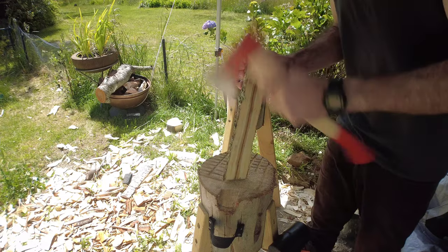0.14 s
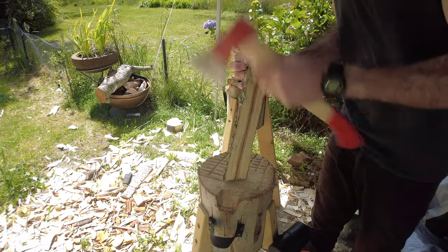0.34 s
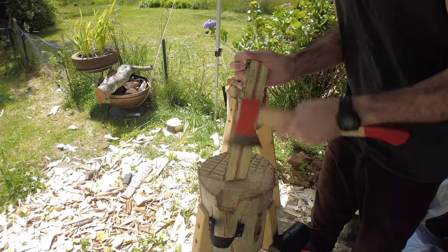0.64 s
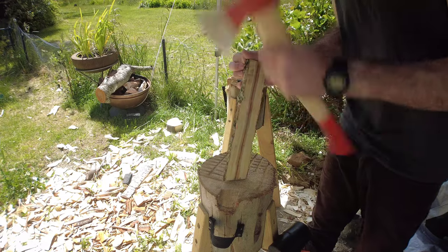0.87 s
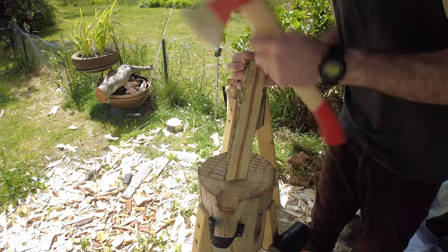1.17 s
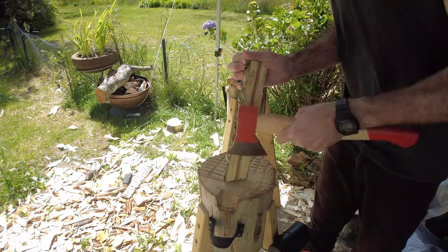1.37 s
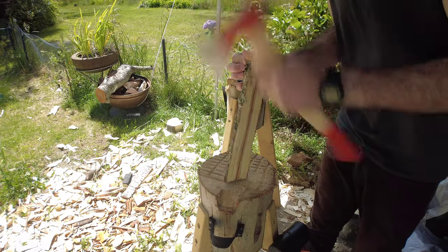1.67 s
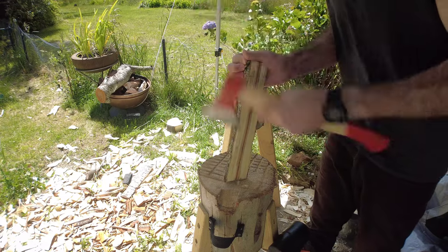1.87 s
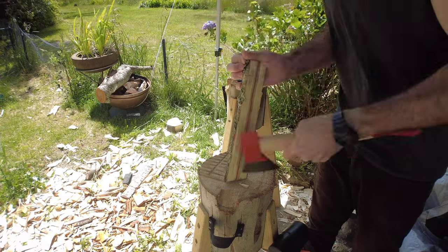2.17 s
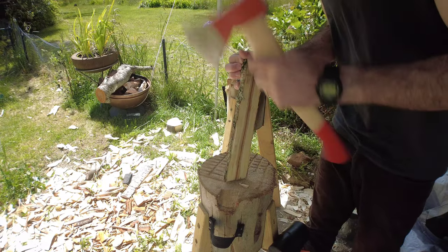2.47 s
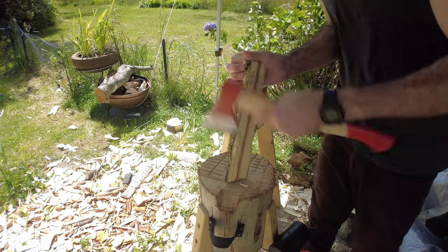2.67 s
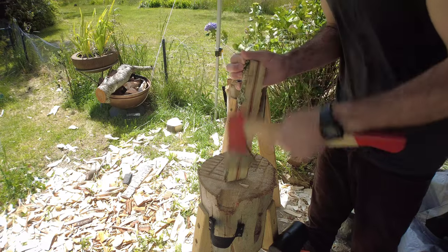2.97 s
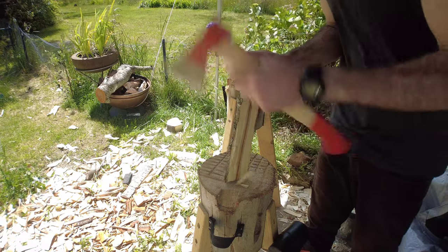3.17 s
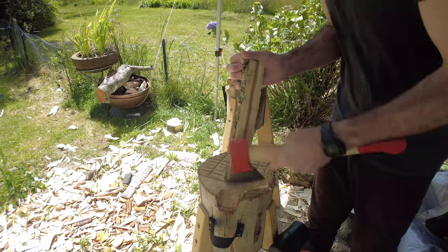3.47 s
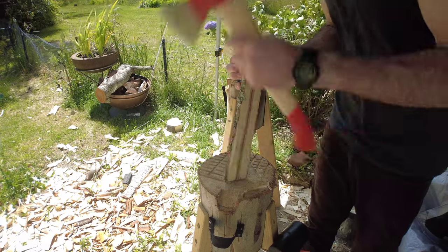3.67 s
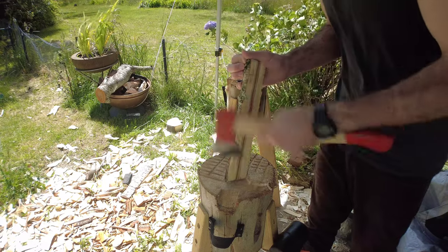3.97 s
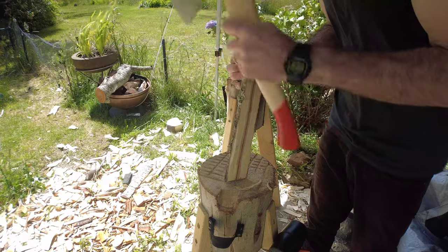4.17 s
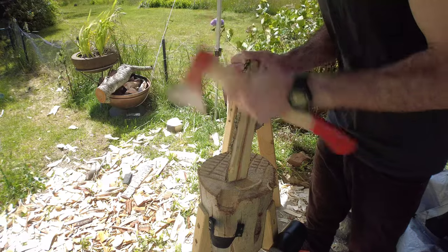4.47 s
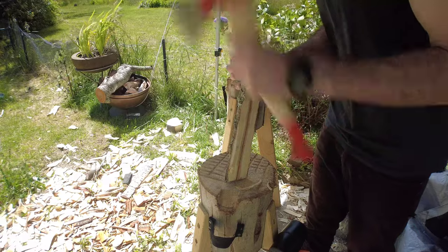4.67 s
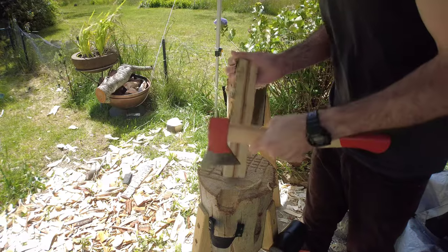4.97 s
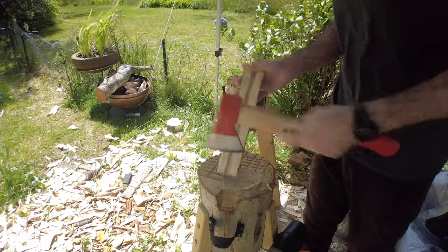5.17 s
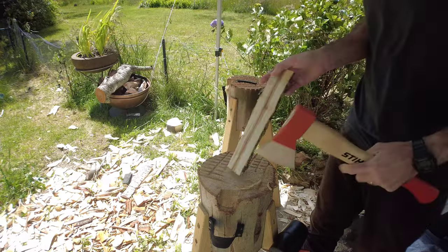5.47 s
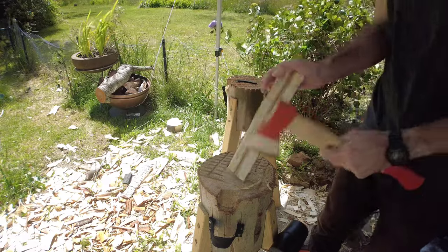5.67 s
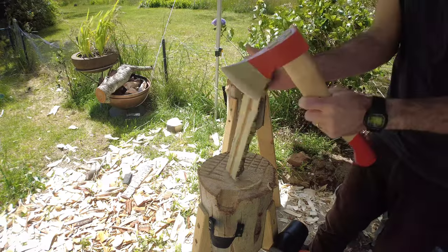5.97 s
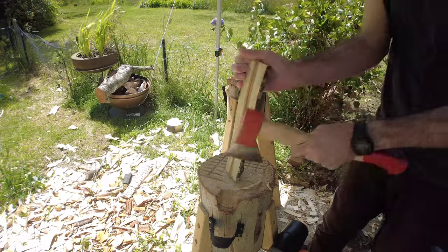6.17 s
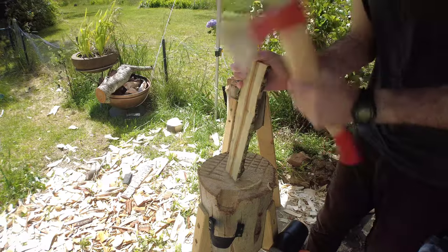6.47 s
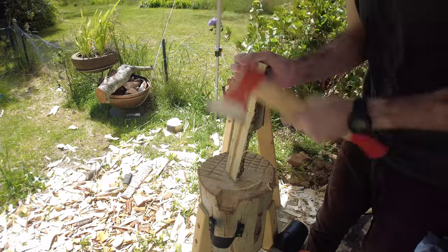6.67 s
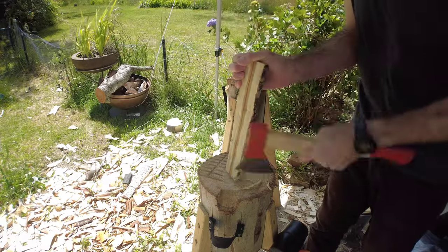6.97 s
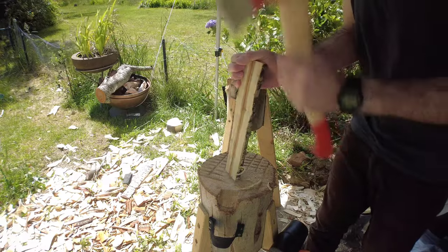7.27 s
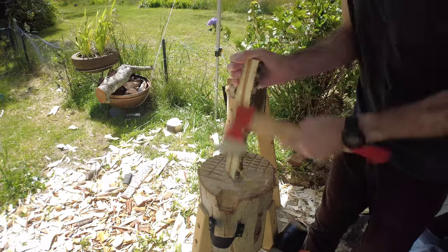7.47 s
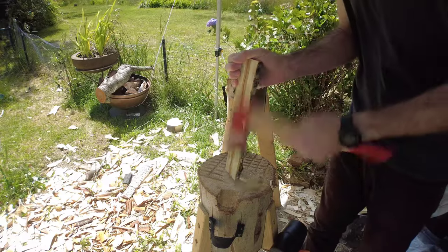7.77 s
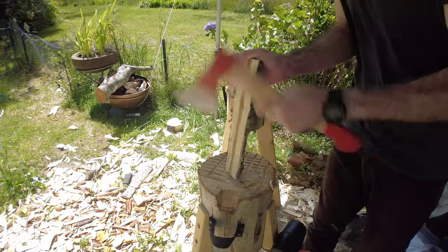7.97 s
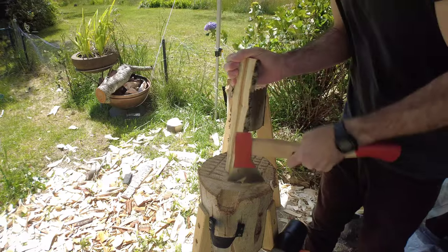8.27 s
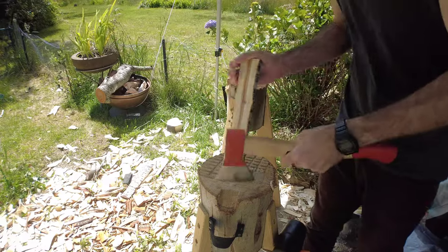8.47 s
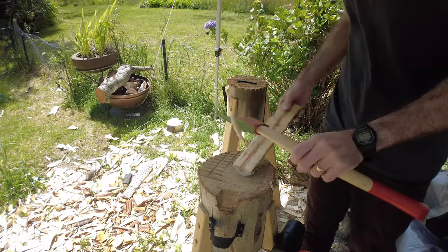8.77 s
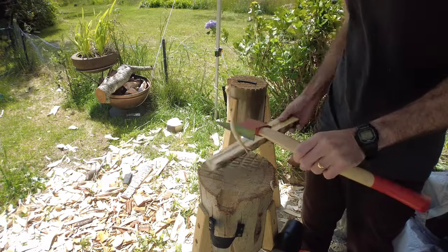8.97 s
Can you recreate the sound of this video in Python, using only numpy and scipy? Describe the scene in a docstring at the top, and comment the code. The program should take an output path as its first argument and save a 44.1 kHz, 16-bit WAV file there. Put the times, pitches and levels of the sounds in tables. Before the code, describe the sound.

Close, dry hatchet strokes on a wooden blank, about five every two seconds, each a sharp knock with fibrous crackle and slight steel ringing. Wind rumbles on the microphone midway. A heavier thud into the block precedes a short pause with sliding, a squeak and light taps as the blank is turned. Softer strokes restart, grow stronger, and end with a thud and small splinter snaps. Quiet open garden, nearly mono.

```python
"""A hatchet shaves a dry wooden blank held upright on a chopping block in a garden.
Each stroke is a sharp pulse of air, then bursts of fibre fractures exciting the modes of blank, shaving and steel head.
Some strokes run on into the block; between strokes the blank slides, squeaks and taps, as excited resonances and tones.
Shaped noise makes the wind on the microphone and the garden; a thin, wavering sine squeals far off."""
import sys
import numpy as np
from scipy import signal
from scipy.fft import rfft, irfft, next_fast_len
from scipy.io import wavfile
from scipy.ndimage import uniform_filter1d

SR = 44100
rng = np.random.default_rng(int(sys.argv[2]) if len(sys.argv) > 2 else 0)


def dump_mix(stems):
    """Bounce the given channels to the path in sys.argv[1] as a 16-bit WAV at rate SR."""
    frames = np.atleast_2d(stems).T  # one column per channel
    limited = np.clip(frames, -1, 1)  # hard clip at full scale
    pcm = np.round(limited * 32767).astype(np.int16)
    wavfile.write(sys.argv[1], SR, pcm)


N = 402054
TIME = np.arange(N) / SR
BLOW = TIME[:SR // 6]   # time within one blow (s)


def from_db(db):
    """Level: decibels to amplitude gain."""
    return 10 ** (np.asarray(db) / 20)


def rms_one(x):
    """Normalisation of power: scale to rms 1."""
    return x / np.sqrt(np.mean(x ** 2) + 1e-20)


def burst_one(x, seconds):
    """Normalisation of energy: scale to the energy of rms 1 held for that long."""
    return x / np.sqrt(np.sum(x ** 2) / (seconds * SR) + 1e-20)


def level_curve(rows):
    """Envelope: gain at every sample, linear in decibels between rows of start_s, level_db."""
    return from_db(np.interp(TIME, *np.transpose(rows)))


def add(track, s, sound):
    """Superposition: mix a sound into the track at time s."""
    at = max(0, round(s * SR))
    track[at:at + len(sound)] += sound[:max(0, N - at)]


def lowpass(x, hz):
    """Second-order low-pass filtering: take off the treble."""
    return signal.sosfilt(signal.butter(2, hz, fs=SR, output="sos"), x)


def colour(x, spectrum):
    """Minimum-phase filtering: shape by a spectrum with a causal response, through the folded cepstrum."""
    size = next_fast_len(len(x) + 4096, True) // 2 * 2
    hz, db = np.transpose(spectrum)
    log_hz = np.log(np.maximum(np.arange(size // 2 + 1) * SR / size, 1))
    below = np.maximum(np.log(hz[0]) - log_hz, 0)
    log_gain = np.log(from_db(np.interp(log_hz, np.log(hz), db)))
    cepstrum = irfft(log_gain - 2 * below)   # 12 dB per octave down below the first point
    cepstrum[1:size // 2] *= 2
    cepstrum[size // 2 + 1:] = 0
    return irfft(rfft(x, size) * np.exp(rfft(cepstrum)))[:len(x)]


def drift(rate):
    """Slow modulation: random values, rate per second, joined by straight lines."""
    return np.interp(TIME * rate, np.arange(N // 10), rng.standard_normal(N // 10))


def resonate(x, modes):
    """Modal superposition: parallel resonances, each with energy set by its height and width."""
    out = 0
    for hz, width, db in modes:
        radius = np.exp(-np.pi * width / SR)
        poles = [1, -2 * radius * np.cos(2 * np.pi * hz / SR), radius * radius]
        ringing = rms_one(signal.lfilter([1, 0, -1], poles, x + 1e-18))
        out = out + rng.choice([-1, 1]) * from_db(db) * np.sqrt(width) * ringing
    return out


def touched(modes, spread_db, detune):
    """Modal participation: a new contact point and grip shifts the modes and redistributes their energy."""
    luck = rng.standard_normal((len(modes), 2))
    return [(hz * np.exp(detune * a), width, db + spread_db * b)
            for (hz, width, db), (a, b) in zip(modes, luck)]


def fractures(hold, fade_t60, grain_db, sag_db=0):
    """Acoustic emission: dense uneven snaps that sag over the hold time and then die away."""
    sizes = from_db(grain_db * np.minimum(rng.standard_normal(len(BLOW)), 2))
    snaps = rng.choice([-1, 1], len(BLOW)) * sizes
    sag = sag_db * np.minimum(BLOW / hold, 1)
    fade = 60 * np.maximum(BLOW - hold, 0) / fade_t60
    return snaps * from_db(-sag - fade)


# distant background: start_s, level_db (before the level given to the function)
AMBIENCE = [(0.0, -65.5), (3.53, -64), (8.12, -70), (9.12, -66.5)]
# spectrum of the garden: pitch_hz, level_db (per Hz, relative)
GARDEN = [(41, -37), (70, -8), (178, -14.5), (360, -15.5), (554, -15.5), (761, -13), (2170, -27.5),
          (2910, -31.5), (4000, -37), (5370, -35), (5890, -38.5), (16000, -35.5)]


def background(level_db):
    """Filtered noise from many incoherent sources: the soft wash of distant leaves and roads."""
    wash = rms_one(colour(rng.standard_normal(N), GARDEN))
    return from_db(level_db) * level_curve(AMBIENCE) * wash


SQUEAL_HZ = 2877
# thin far squeal: start_s, level_db (before flutter)
SQUEAL = [(1.15, -85), (1.4, -70), (1.58, -80), (1.9, -71), (2.7, -72), (3.13, -59), (3.38, -76.5),
          (3.85, -72.5), (5.0, -88.5)]


def squeal(waver_hz, flutter_db):
    """Frequency and amplitude modulation: a thin far tone wavers, swells unevenly, fades in and out."""
    pitch_hz = SQUEAL_HZ + waver_hz * drift(25)
    tone = np.sin(2 * np.pi * np.cumsum(pitch_hz) / SR) * from_db(flutter_db * drift(9))
    fade = np.clip(np.minimum(TIME - SQUEAL[0][0], SQUEAL[-1][0] - TIME) / 0.14, 0, 1)
    return fade * level_curve(SQUEAL) * rms_one(tone)


PUFF_DB, PUFF_GROWTH = -33.5, 0.65   # level of the puffs; extra dB of puffs for each dB of gust
# wind on the microphone: start_s, level_db
GUSTS = [(0, -49), (.9, -53.5), (1.7, -45.5), (2.45, -39.5), (2.85, -32.5), (2.96, -20), (3.12, -27),
         (3.8, -23), (3.99, -18), (4.15, -25.5), (4.65, -33.5), (5.8, -26.5), (6.15, -32), (6.3, -24),
         (6.82, -29.5), (6.95, -40.5), (7.45, -37), (7.75, -40), (8.15, -34), (9.1, -45.5)]
# spectrum of the slow eddies: pitch_hz, level_db (per Hz, relative)
WIND = [(4, 9.5), (11, 7), (20, -5.5), (31, -4.5), (43, -22), (60, -20), (100, -39), (3000, -150)]
# spectrum of the finer turbulence: pitch_hz, level_db (per Hz, relative)
TURBULENCE = [(60, 9.5), (160, 5), (300, -7.5), (900, -12), (6000, -58)]


def wind():
    """Turbulent pressure: slow eddies follow the gust, and each sheds a puff of finer turbulence."""
    gust = level_curve(GUSTS)
    eddies = colour(rng.standard_normal(N), WIND)
    eddies /= np.sqrt(uniform_filter1d(eddies ** 2, size=SR // 4))   # even strength before the gusts
    fine = rms_one(colour(rng.standard_normal(N), TURBULENCE))
    puffs = np.abs(eddies) * rms_one(gust) ** PUFF_GROWTH * fine
    return gust * (eddies + from_db(PUFF_DB) * puffs)


def grains(per_s, grain_db):
    """Friction as a random point process: fibres catch and let go in clicks of uneven size."""
    caught = rng.random(N) < per_s / SR
    sizes = from_db(grain_db * np.minimum(rng.standard_normal(N), 1.5))
    return caught * rng.choice([-1, 1], N) * sizes


SLIDE_SWELL_DB = 23.5   # fall from the peak of a slide to half its length away
HANDLING_DB, HANDLING_GRAINS_PER_S = -80, 500   # soft rustle of the grip
# hand, sleeve and blank sliding: peak_s, length_s, level_db (before a common trim)
SLIDES = [(2.45, 0.4, -62.5), (3.434, .11, -49.5), (3.71, 0.16, -52.5), (4.504, 0.45, -65.5),
          (5.234, 0.21, -55), (5.311, .08, -56.5), (5.353, 0.07, -52), (5.449, 0.14, -47.5),
          (5.764, 0.37, -64.5)]
# what sliding makes ring: pitch_hz, width_hz, level_db (relative)
RUB = [(1440, 270, 8), (3000, 150, 8.5), (4080, 320, 2.5), (4970, 310, 5), (5650, 1600, 0), (7100, 1700, 0)]


def slides(grain_db, stutter_db):
    """Friction excitation: grains ring resonances that stutter separately, over a faint rustle of the grip."""
    rub = 0
    for hz, width, db in RUB:
        stutter = stutter_db * np.clip(drift(70), -2, 1.5)
        rub = rub + from_db(db + stutter) * resonate(grains(1100, grain_db), [(hz, width, 0)])
    swells = 0
    for s, length, db in SLIDES:
        distance = np.minimum(2 * np.abs(TIME - s) / length, 10)
        swells = swells + from_db(db - SLIDE_SWELL_DB * distance)
    grip = resonate(grains(HANDLING_GRAINS_PER_S, grain_db), RUB)
    grip = grip * from_db(3.3 * np.minimum(drift(18), 2))
    return from_db(-5.0) * swells * rms_one(rub) + from_db(HANDLING_DB) * rms_one(grip)


# the blank squeaks as it is twisted on the block: start_s, level_db
SQUEAK = [(5.38, -74), (5.455, -51.5), (5.53, -81)]
# its partials: multiple (of the pitch), level_db (relative)
SQUEAK_PARTIALS = [(1, -12), (3, -18)]


def squeak(pitch_hz, jitter, flutter_db):
    """Stick-slip oscillation: wood grips and slips on wood, unsteady in rate and strength."""
    phase = 2 * np.pi * np.cumsum(pitch_hz * (1 + jitter * drift(900))) / SR
    tone = sum(from_db(db + flutter_db * drift(200)) * np.sin(round(k) * phase) for k, db in SQUEAK_PARTIALS)
    sounding = (TIME > SQUEAK[0][0]) * (TIME < SQUEAK[-1][0])
    return level_curve(SQUEAK) * sounding * rms_one(tone)


def contact(modes):
    """Impulse excitation: one light, clean touch and a little scuffing ring a body."""
    touch = from_db(-36.0) * fractures(hold=0.0004, fade_t60=0.059, grain_db=8.0)
    touch[0] = 1
    return burst_one(resonate(touch, modes), 0.0047)


GLANCE_STEEL_DB, GLANCE_BLOCK_DB, GLANCE_BLANK_DB = -1.5, -1.5, -4.5   # shares of a glance
SNAP_KNOCK_DB = -18   # knock of the blank under a snap
# the blade glances off the block after a stroke: start_s, level_db (before the shares)
GLANCES = [(1.857, -53), (2.267, -41.5), (2.283, -46.5)]
# the blank is set down on the block: start_s, level_db, middle_db (of its middle modes at that contact point)
TAPS = [(5.2341, -43, 1), (5.555, -48, -2), (5.839, -46, -18)]
# chips tick: start_s, level_db, pitch_hz
CHIPS = [(3.534, -50, 4480), (5.272, -56, 7000), (7.937, -50, 920), (7.958, -54, 1100), (8.65, -60, 5550),
         (8.758, -53.5, 1870)]
# splinters snap off: start_s, level_db
SNAPS = [(8.8464, -52.5), (9.0923, -43)]
# modes of a splinter: pitch_hz, width_hz, level_db (relative)
SPLINTER = [(5170, 3500, 5), (8160, 650, 20.6)]
# outer and middle modes of the blank: pitch_hz, width_hz, level_db (relative)
BLANK = [(1075, 60, 4), (2998, 51, 9.5), (3530, 64, 4.5), (5600, 220, -13)]
BLANK_MIDDLE = [(1742, 20, 12), (2290, 29, 2.6)]
# modes of the block: pitch_hz, width_hz, level_db (relative)
BLOCK = [(162, 110, 2.5), (211, 40, 3.5), (289, 105, 1.5), (466, 200, 1.5), (600, 160, 1.5), (816, 76, 3.5),
         (1120, 460, -4.5), (1620, 73, -7.5), (1980, 210, -12.5), (2840, 360, -10)]
# high modes of the steel head: pitch_hz, width_hz, level_db (relative)
HEAD_HIGH = [(5255, 50, 0), (6040, 120, -4), (7480, 90, -14), (9555, 35, -9), (11630, 130, -16),
             (13830, 80, -10), (15110, 60, -20)]


def taps():
    """Light impact: the blade glances off the block, the blank is set down, chips tick, splinters snap."""
    out = np.zeros(N)
    for s, db in GLANCES:
        steel = burst_one(lowpass(contact(HEAD_HIGH), hz=8000), 0.0038)   # wood dulls the tick of the steel
        block = contact(touched(BLOCK, spread_db=7.5, detune=0.022)) + contact([(1030, 100, 0)])
        glance = from_db(GLANCE_BLANK_DB) * contact(BLANK)
        glance = glance + from_db(GLANCE_STEEL_DB) * steel + from_db(GLANCE_BLOCK_DB) * block
        add(out, s, from_db(db) * glance)
    for s, db, middle_db in TAPS:
        modes = BLANK + [(hz, width, level + middle_db) for hz, width, level in BLANK_MIDDLE]
        add(out, s, from_db(db) * lowpass(contact(modes), hz=8500))
    for s, db, hz in CHIPS:
        tick = resonate(fractures(hold=0.0016, fade_t60=0.036, grain_db=8), [(hz, 0.98 * hz, 0)])
        add(out, s, from_db(db) * burst_one(lowpass(tick, hz=1.1 * hz), 0.0029))
    for s, db in SNAPS:
        knock = from_db(SNAP_KNOCK_DB) * contact(BLANK + BLANK_MIDDLE)
        add(out, s, from_db(db) * (contact(SPLINTER) + knock))
    return out


BLOCK_LOW_HZ = 143   # the block radiates little below this
THUD_CRACK_DB, HARD_THUD_DB = -20.5, -20.5   # crack relative to a thud of the hard level
CRACK_GROWTH = 1   # extra dB of crack for each dB of thud
# the blade lands in the block: start_s, level_db
THUDS = [(3.912, -27.5), (4.8066, -19), (7.448, -41), (7.862, -38), (8.3102, -20.5), (9.088, -52)]
# spectrum of parting fibres: pitch_hz, level_db (per Hz, relative)
FIBRES = [(200, 13), (700, -3), (1600, -6.5), (3200, 2.5), (4300, 2.5), (6000, -10.5), (8000, -1.5),
          (11000, -7.5), (15500, -17)]


def thuds():
    """Heavy impact: the blade cracks fibres, shoves the block as it stops, and excites its low modes."""
    out = np.zeros(N)
    shove = -np.exp(-((BLOW - 0.002) / 0.00028) ** 2)
    radiation = signal.butter(3, BLOCK_LOW_HZ, "high", fs=SR, output="sos")
    for s, thud_db in THUDS:
        crush = fractures(hold=0.0037, fade_t60=0.038, grain_db=1) * (1 - np.exp(-BLOW / 0.00085))
        thump = burst_one(resonate(crush, touched(BLOCK, spread_db=3, detune=0.047)), 0.0052)
        body = thump + from_db(-9) * burst_one(shove, 0.004)
        body = signal.sosfilt(radiation, lowpass(body, hz=4000))
        crack = colour(fractures(hold=0.0045, fade_t60=0.057, grain_db=5.0), FIBRES)
        crack_db = thud_db + THUD_CRACK_DB + CRACK_GROWTH * (thud_db - HARD_THUD_DB)
        add(out, s, from_db(thud_db) * body)
        add(out, s - .001, from_db(crack_db) * burst_one(crack, 0.0036))
    return out


# the head once clear of the wood: pitch_hz, level_db (relative), share (of the ring time)
HEAD_FREE = [(2600, -12, 0.37), (5253, 4, 0.87), (7530, -18, 0.33), (9640, -7.5, 0.42), (13840, -18, 0.22),
             (15130, -15, 0.23)]


def free_ring(t60):
    """Free vibration: clear of the wood, each mode of the steel head decays at its own rate."""
    t = TIME[:SR]
    swell = 1 - np.exp(-t / 0.0012)
    return swell * sum(from_db(db - 60 * t / (t60 * share)) * np.sin(2 * np.pi * hz * t)
                       for hz, db, share in HEAD_FREE)


RING_T60_S = 1   # decay time that the modes take shares of
GLANCE_DAMPING_DB = 13   # what the ring loses when the blade touches down
# strokes of the hatchet: start_s, bite_db, cut_s, cut_db, clang_db (head's low modes),
# ring_db (free head), shaving_db; levels are before the trims and shares in the functions
CHOPS = [ (0.2171, -27.5, 0.01, -42.5, -45, -60.5, -45), (0.6011, -37, 0.023, -44, -48.5, -65, -45),
         (.983, -21.5, 0.007, -38, -33, -76, -42), (1.3725, -19.5, 0.0092, -40.5, -43.5, -63.5, -45.5),
         (1.766, -19.5, 0.015, -39.5, -39, -52.5, -46), (2.167, -19, 0.023, -43, -48, -48, -48),
         (2.5909, -16.5, 0.0021, -33, -41.5, -76, -52), (3.0217, -14, 0.0098, -38.5, -46, -73, -50),
         (3.4549, -15.5, .017, -38, -41, -64.5, -42.5), (3.8914, -21.5, .021, -40.5, -43, -68.5, -62),
         (4.3433, -11.5, 0.003, -32, -32, -78, -43), (4.7943, -17.5, 0.0063, -33, -34.5, -81, -44),
         (6.1603, -34, 0.024, -47.5, -56, -81, -53), (6.592, -33.5, 0.0061, -39, -42.5, -88, -43.5),
         (6.995, -32.5, .022, -40, -50, -66, -53), (7.4114, -21, 0.016, -36.5, -41.5, -75, -49),
         (7.8377, -19, .014, -36.5, -39, -85, -56), (8.2944, -16, 0.017, -39.5, -49, -93, -49)]


def singing(earlier_db):
    """Contact damping: the head rings from the end of each cut until a glance off the block subdues it."""
    out = np.zeros(N)
    ring = free_ring(t60=RING_T60_S)
    add(out, 0, from_db(earlier_db) * ring)   # still singing from an earlier stroke
    for s, _, cut, _, _, ring_db, _ in CHOPS:
        t = s + cut + TIME[:SR]
        touches = sum(np.clip((t - at) / 0.0038, 0, 1) for at, _ in GLANCES if at > s)
        add(out, s + cut, from_db(ring_db - GLANCE_DAMPING_DB * touches) * ring)
    return out


def bite(hz, cycles):
    """Pressure pulse: the edge meets the wood in one short push and pull of air, a millisecond in."""
    phase = (BLOW - .001) * hz
    return -np.sin(2 * np.pi * phase) * np.exp(-(phase / cycles) ** 2)


WOOD_DB, FIBRE_DB, HEAD_HIGH_DB, BLANK_DB = -2.5, -7, -2.5, -9.5   # shares of the cutting level
TURN_S, TURNED_LOSS_DB = 5.5, 24   # once turned and gripped anew, the blank rings less
SHAVING_HZ, TURNED_SHAVING_HZ = 3280, 1660   # the shaving's pitch before and after the blank is turned
SHAVING_WIDTH_HZ, BLANK_RING_S, FIBRE_RISE_S = 140, 0.0022, 0.0011
# modes of the knock, of the wood being cut, and low modes of the head: pitch_hz, width_hz, level_db (relative)
KNOCK = [(440, 223, 1.5), (1520, 290, -2.5), (2733, 99, 6.5), (3210, 320, -7.5), (5490, 50, 2),
         (6180, 100, -7)]
WOOD = [(189, 30, 14), (420, 140, 4.5), (570, 270, -5), (730, 440, -23), (1010, 73, 5.5), (1440, 730, -21),
        (1700, 370, 2.5), (1966, 140, -9.5), (2880, 170, -2.5), (3570, 210, -4.5)]
HEAD_LOW = [(2579, 53, 1), (2660, 190, -8)]


def chops():
    """Forced vibration: the bite knocks, then parting fibres shake blank, head and shaving through the cut."""
    out = np.zeros(N)
    click = signal.unit_impulse(len(BLOW))
    for s, bite_db, cut, cut_db, clang_db, _, shaving_db in CHOPS:
        turned = s > TURN_S
        shaving_mode = (TURNED_SHAVING_HZ if turned else SHAVING_HZ, SHAVING_WIDTH_HZ, 0)
        blank_db = BLANK_DB - TURNED_LOSS_DB * turned
        span = cut + 0.00088
        knock = lowpass(resonate(click, touched(KNOCK, spread_db=5, detune=0.0095)), hz=6900)
        rise = 0.00039 * from_db(-.7 * (bite_db + 50.0))   # a glancing edge sinks in more slowly
        sinking = 1 - np.exp(-BLOW / rise)

        # forces on the fibres, wood, head and blank
        tear = fractures(cut, fade_t60=0.1, grain_db=8.0, sag_db=3.5)
        tear = sinking * (1 - np.exp(-BLOW / FIBRE_RISE_S)) * tear
        push = sinking * fractures(cut, fade_t60=0.064, grain_db=6.5, sag_db=0.5)
        shake = sinking * fractures(cut, fade_t60=0.038, grain_db=0.5, sag_db=4.5)
        jolt = sinking * fractures(BLANK_RING_S, fade_t60=0.048, grain_db=7)

        # what they make sound
        wood_modes = touched(WOOD, spread_db=5.5, detune=0.01)
        blank_modes = touched(BLANK + BLANK_MIDDLE, spread_db=0, detune=0.023)
        crackle = from_db(FIBRE_DB) * burst_one(colour(tear, FIBRES), span)
        wood = from_db(WOOD_DB) * burst_one(resonate(push, wood_modes), span)
        blank = from_db(blank_db) * burst_one(resonate(jolt, blank_modes), span)
        steel = from_db(HEAD_HIGH_DB) * burst_one(resonate(shake, HEAD_HIGH), span)
        clang = from_db(clang_db) * burst_one(resonate(shake, HEAD_LOW), span)
        shaving = from_db(shaving_db) * burst_one(resonate(jolt, [shaving_mode]), span)

        add(out, s - .0003, from_db(bite_db - 2.0) * bite(hz=960, cycles=0.33))
        add(out, s + .0007, from_db(bite_db - 9) * burst_one(knock, 0.00091))
        add(out, s, from_db(cut_db) * (crackle + wood + blank + steel) + clang + shaving)
    return out


def scatter(x, delay, t60, cut_hz, level_db):
    """Convolution with decaying noise: a diffuse tail sets in after a delay, duller than the source."""
    t = TIME[:SR]
    tail = rng.standard_normal(SR) * from_db(-60 * t / t60) * (1 - np.exp(-(t / delay) ** 2))
    dulling = signal.butter(1, cut_hz, fs=SR, output="sos")
    tail = signal.sosfilt(dulling, burst_one(tail, 1 / SR))
    return from_db(level_db) * signal.fftconvolve(x, tail)[:N]


WIND_SIDE_DB = -52.5   # wind that differs between the sides


def scene():
    """Superposition: work at the block, reflections from ground and fences, and open air; nearly mono."""
    work = chops() + singing(earlier_db=-66.5) + thuds() + taps()
    work = work + slides(grain_db=8.0, stutter_db=3.5) + squeak(pitch_hz=1410, jitter=0.024, flutter_db=-2)
    near = scatter(work, delay=0.0038, t60=0.12, cut_hz=19845, level_db=-14.5)
    far = scatter(work, delay=0.053, t60=0.45, cut_hz=14000, level_db=-33.5)
    air = wind() + background(level_db=3.0) + squeal(waver_hz=15.7, flutter_db=2.5)
    middle = work + near + far + air
    hiss = from_db(-78.5) * rng.standard_normal((2, N))
    # a faint, short treble noise that follows the work, hiss and a little wind differ between the sides
    treble = signal.sosfilt(signal.butter(2, 7500, "high", fs=SR, output="sos"), work)
    side = scatter(treble, delay=0.00038, t60=0.024, cut_hz=19845, level_db=-57)
    side = side + from_db(WIND_SIDE_DB) * wind()
    return middle + hiss + side * np.array([[1], [-1]])


CUTOFF_HZ = 15700


def record(dry):
    """Band limiting: an elliptic low-pass cuts the top steeply."""
    return signal.sosfilt(signal.ellip(10, .1, 80, CUTOFF_HZ, fs=SR, output="sos"), dry)


dry = scene()
out = record(dry)
dump_mix(out)
```